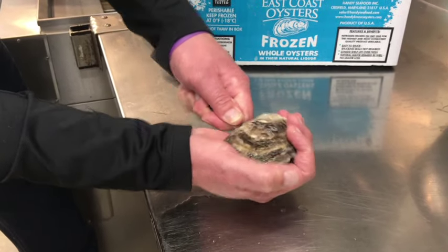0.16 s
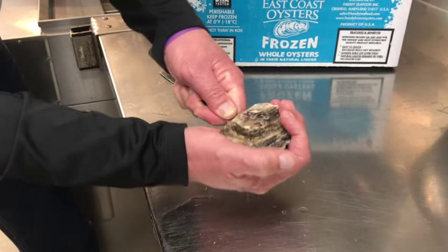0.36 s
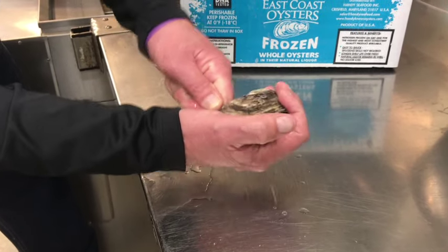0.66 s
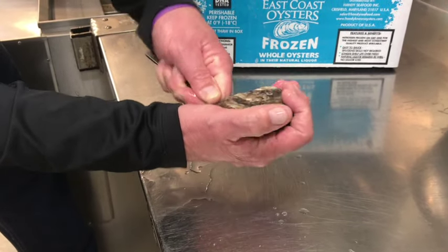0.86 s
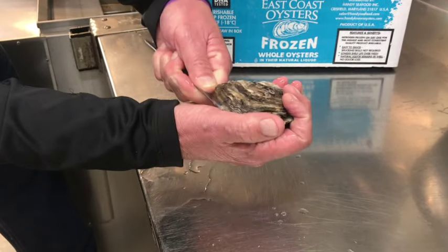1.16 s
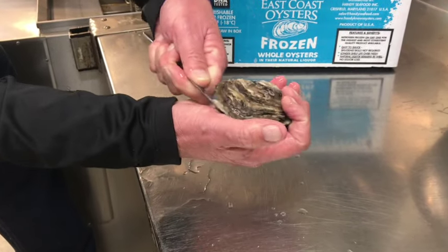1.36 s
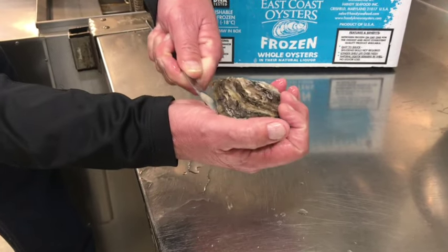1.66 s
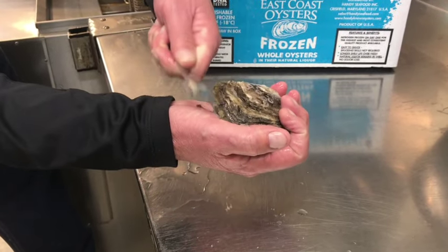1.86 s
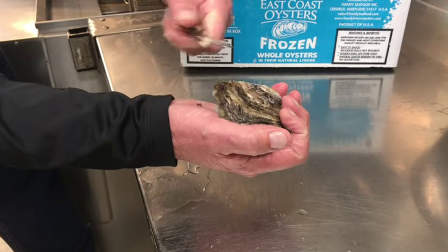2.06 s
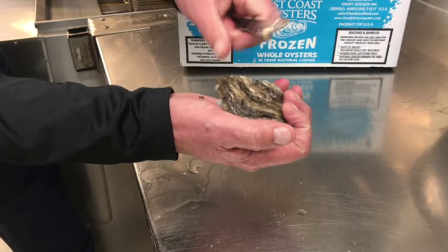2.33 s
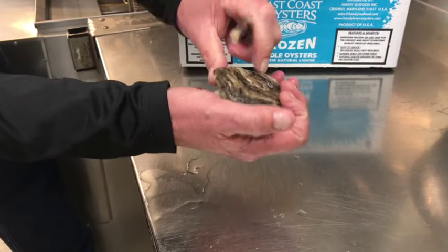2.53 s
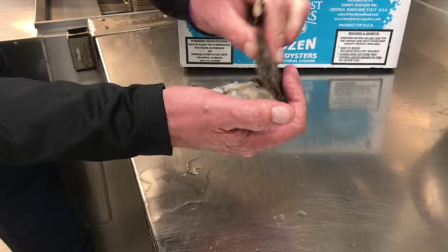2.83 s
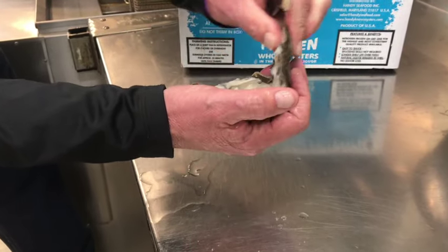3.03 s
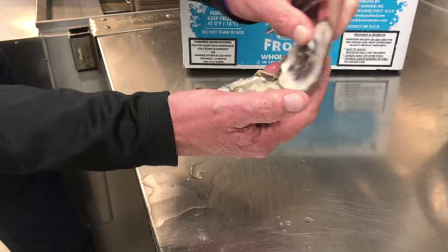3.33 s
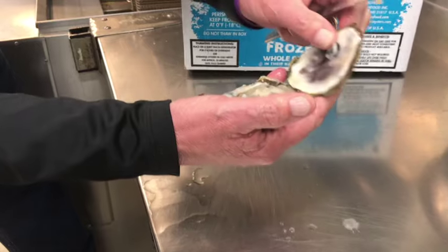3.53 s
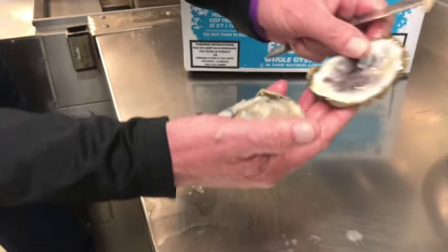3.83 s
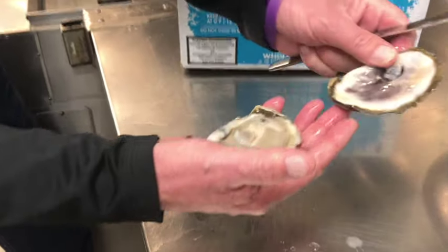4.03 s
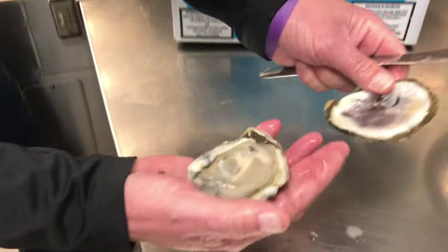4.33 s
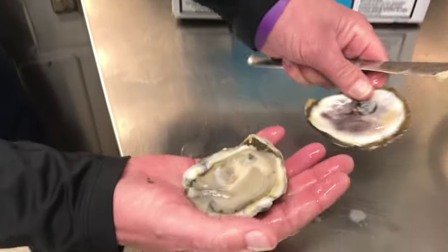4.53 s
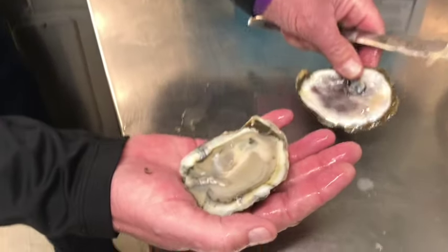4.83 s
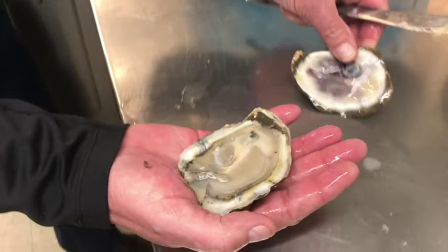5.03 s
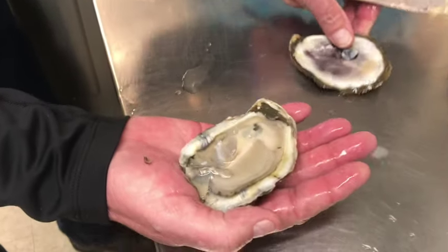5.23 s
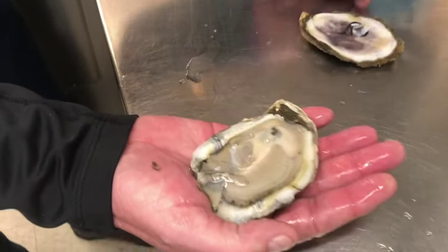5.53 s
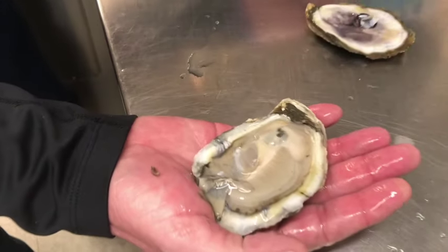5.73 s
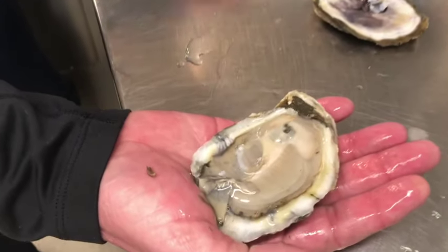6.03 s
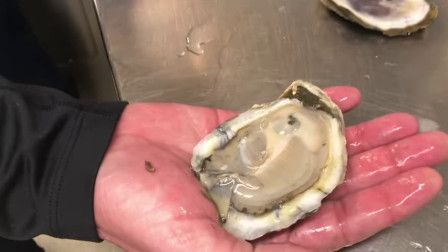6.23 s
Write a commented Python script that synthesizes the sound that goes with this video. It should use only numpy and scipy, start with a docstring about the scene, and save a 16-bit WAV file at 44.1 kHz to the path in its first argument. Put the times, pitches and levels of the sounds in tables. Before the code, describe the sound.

A low fridge drone with a faint wavering fan whine runs throughout, in a small, hard kitchen. Close by, a steel knife twists into an oyster with a few tiny clicks, and at about 0.4 seconds the hinge gives with a sharp hollow knock, the loudest sound. Smaller cracks and gritty scrapes follow, with clear snaps near 1.3 and 1.7 seconds. From 2 to 2.8 seconds the blade grinds along the rim in a quick run of bright, brittle crunches. Then only the hum remains for well over a second. The loose top shell ticks against a steel counter at about 4.7 seconds, touches faintly around 5.1, and lands with a brighter, briefly ringing tap near 5.4. Wet fingers slide over the shell with soft, fine crackles from about 4.9 to 6.2 seconds.

```python
"""Opening an oyster in a kitchen

A steel knife pries open an oyster held in the palm. The hinge gives with a hollow knock, and the rim
crackles and scrapes as swarms of tiny breaks make the shell ring. Wet fingers slide over the shell,
and the top half is set down on a steel counter. A fridge motor and its fan hum in the small, hard room."""
import sys
import numpy as np
from scipy import signal
from scipy.fft import rfft, irfft
from scipy.io import wavfile
from scipy.ndimage import uniform_filter1d

SR = 44100
rng = np.random.default_rng(int(sys.argv[2]) if len(sys.argv) > 2 else 0)


def store_wav(level_fs):
    """Save 16-bit WAV to argv[1]."""
    pcm = np.round(np.clip(np.atleast_2d(level_fs), -1, 1) * 32767)
    wavfile.write(sys.argv[1], SR, pcm.T.astype(np.int16))


N = 281358
TIME = np.arange(N) / SR
SHORT_TIME = np.arange(2 ** 14) / SR  # time axis of one short sound
SHORT_HZ = np.arange(2 ** 13 + 1) * SR / 2 ** 14  # its frequency axis
LEAD_S = .13  # each short sound peaks this long after its start

# The pitches at which the closed oyster rings with the blade in it: pitch_hz, width_hz, level_db
OYSTER_RINGS = [(2290, 74, -9.5), (2900, 360, 0), (3860, 290, -1), (4500, 400, 0.5), (5400, 297, -1),
                (5930, 290, 5.5), (6880, 250, 1.5), (8650, 440, 0), (9290, 350, -1), (10390, 255, -10),
                (12200, 700, -26.5), (14400, 1200, -7.5)]


def undb(db):
    """Turn decibels into a gain."""
    return 10 ** (np.asarray(db) / 20)


def level(sound, db):
    """Give a short sound as much energy as a steady one that lasts 0.05 s at this level."""
    return sound * undb(db) * np.sqrt(.05 * SR / np.sum(sound ** 2))


def add(track, peak_s, sound):
    """Mix in a short sound so that it peaks at peak_s."""
    start = int((peak_s - LEAD_S) * SR)
    lo, hi = max(start, 0), min(start + len(sound), N)
    track[lo:hi] += sound[lo - start:hi - start]


def drift(turns_per_s):
    """A smooth random wander, mostly between -1 and 1."""
    size = int(SR / turns_per_s)
    steps = np.repeat(rng.standard_normal(N // size + 1), size)
    return 1.232 * uniform_filter1d(steps, size)[:N]


def resonance(hz, width_hz):
    """A filter that rings at one pitch; the narrower it is, the longer it rings."""
    loss = 1j * SHORT_HZ * width_hz
    return loss / (hz ** 2 - SHORT_HZ ** 2 + loss)


def ring(force, response, tilt_db=0):
    """The sound of a pushed object; tilt_db per octave brightens or dulls it above 2000 Hz."""
    octaves = np.log2(np.maximum(SHORT_HZ, 2000) / 2000)
    return irfft(rfft(force) * response * undb(tilt_db * octaves))


def shell_response(rings, snap_db, low_hz, grip_shift):
    """A shell's rings, shifted at random by the grip, plus a dry snap. So small a thing gives no bass."""
    shift, weight = rng.standard_normal((2, len(rings)))
    ringing = sum((-1) ** k * undb(db + 1.5 * weight[k]) * resonance(hz * (1 + grip_shift * shift[k]), w)
                  for k, (hz, w, db) in enumerate(rings))
    bass_cut = resonance(low_hz, low_hz) * 1j * SHORT_HZ / low_hz
    return bass_cut * (ringing + undb(snap_db) * resonance(2400, 10000))


def grains(swell_s, fade_s, per_s, spread_db):
    """A swelling and fading swarm of tiny slips and breaks of very unequal size."""
    t = SHORT_TIME - LEAD_S
    envelope = np.exp(np.where(t < 0, t / swell_s, -t / fade_s))
    happens = rng.random(len(t)) < per_s / SR
    size = undb(spread_db * np.minimum(rng.exponential(size=len(t)), 4))
    return envelope * happens * size * rng.choice([-1, 1], len(t))


def crackle(swell_s, fade_s, per_s, spread_db, sharpness=7, count=14):
    """Slips at many small spots, each ticking at a pitch of its own."""
    pitches = np.geomspace(1500, 15000, count) * np.exp(0.054 * rng.standard_normal(count))
    spots = [ring(grains(swell_s, fade_s, per_s, spread_db), resonance(hz, hz / sharpness))
             for hz in pitches]
    return sum(spot * np.sqrt(hz) / np.linalg.norm(spot) for spot, hz in zip(spots, pitches))


def sine(hz, db):
    """A pure tone of steady pitch."""
    return np.sqrt(2) * undb(db) * np.sin(2 * np.pi * hz * TIME)


def wavering_tone(hz, db, waver_hz):
    """A tone that wanders in pitch and strength."""
    phase = 2 * np.pi * np.cumsum(hz + waver_hz * drift(14)) / SR
    return np.sqrt(2) * undb(db + 0.86 * drift(6.8)) * np.sin(phase)


def fridge_motor(motor_hz=58.66, mains_hz=60):
    """The motor drones and lags behind the mains power, so their overtones slowly pulse together."""
    # How loud the drone is over time: time_s, level_db
    drone_levels = [(0.15, -36), (2.57, -37), (3.55, -39), (5.22, -36), (6.2, -36)]
    # Overtones of the motor and the mains: multiple, motor_db, mains_db
    overtones = [(2, -63.5, -52), (4, -63.5, -61)]
    drone = sine(motor_hz, np.interp(TIME, *np.transpose(drone_levels)))
    return drone + sum(sine(k * motor_hz, motor_db) + sine(k * mains_hz, mains_db)
                       for k, motor_db, mains_db in overtones)


def fridge_fan(main_hz=724, throb_hz=1.6):
    """The fan whines with wavering tones over the rush of its air."""
    # The fan's other tones: pitch_hz, level_db, waver_hz
    whines = [(237.5, -57.5, .6), (599, -69.5, .6), (752.3, -68.5, 2), (838, -75, 3), (1057, -69, 1.2),
              (1210, -74, 2.01), (1582, -72.5, 7), (2520, -71.5, 7.03), (2955, -74.5, 8.07),
              (3946, -81.5, 12)]
    # The rushing air, from bass to treble: pitch_hz, level_db (in each 1 Hz band)
    air_levels = [(25, -82), (45, -82), (82, -66.5), (97, -76.5), (155, -79), (188, -74.5), (215, -73.5),
                  (260, -71.5), (350, -79.5), (480, -90), (900, -89), (2000, -99), (4000, -105),
                  (8000, -109), (15500, -113)]
    main_db = -65 + 3 * np.clip((TIME - 2.58) / .2, 0, 1)  # steps up once
    throb = 1 - undb(-10.5) * np.cos(2 * np.pi * throb_hz * TIME)  # from a weaker tone close by
    whine = throb * wavering_tone(main_hz, main_db, waver_hz=1)
    whine += sum(wavering_tone(*row) for row in whines)
    air_hz, air_db = np.transpose(air_levels)
    bins_hz = np.maximum(np.arange(N // 2 + 1) * SR / N, 1)
    colour = undb(np.interp(np.log(bins_hz), np.log(air_hz), air_db)) * np.sqrt(SR / 2)
    air = irfft(rfft(rng.standard_normal(N)) * colour, N)
    return whine + air * undb(0.45 * drift(5.8))


def hollow_knock(hz, db, fade_s, lag_s=0.00221):
    """The gap between the two shells, cupped in the hand, booms briefly just after a break."""
    jolt = np.zeros(len(SHORT_TIME))
    jolt[int((LEAD_S + lag_s) * SR)] = 1
    boom = ring(jolt, resonance(hz, 215) * resonance(hz, 470) ** 2)
    crumbs = grains(0.0022, 1.2 * fade_s, per_s=6000, spread_db=2.4)
    grit = ring(crumbs, resonance(1.05 * hz, 700) * resonance(hz, 1300) ** 2)
    handle_and_palm = resonance(810, 214) * resonance(1276, 700)
    handle_and_palm += 0.29 * resonance(750, 692) * resonance(660, 900)
    thud = ring(jolt, handle_and_palm)
    return level(level(boom, 0) + level(grit, -13) + level(thud, -25), db)


def crunch(force, shell, db, flake_hz, flake_db):
    """Breaks ring the whole oyster, and the flake under the blade adds a pitch of its own."""
    # a smaller flake rings higher and weaker, and makes the whole crunch brighter
    octaves = np.log2(flake_hz / 7000)
    whole = ring(force, shell, tilt_db=4.5 * octaves)
    flake = ring(force, resonance(flake_hz, 800) * resonance(flake_hz, flake_hz / 2))
    return level(level(whole, 0) + level(flake, flake_db - 5.5 * octaves), db)


def knife_cracks():
    """The knife twists and the brittle shell cracks, each time with a knock and a crunch."""
    # Sudden breaks: peak_s, swell_s, fade_s, hollow_db, crunch_db, flake_hz
    cracks = [(.098, 0.00054, 0.0048, -54, -57.5, 2750), (.186, .0004, 0.0034, -51, -55.5, 4540),
              (.293, 0.0031, .006, -46.5, -50.5, 6400), (.4226, 0.0014, 0.0023, -18.5, -40.5, 7600),
              (.607, .001, .002, -42, -49.5, 4740), (.748, .0015, 0.0024, -57, -50.5, 3570),
              (.845, 0.0019, 0.0035, -38.5, -47, 4330), (.862, .001, .002, -48, -42, 7600),
              (1.17, 0.0043, 0.0049, -58.5, -52.5, 4000), (1.322, 0.0012, 0.0037, -37, -36, 4520),
              (1.686, 0.00072, 0.0024, -31.5, -26.5, 6400), (1.959, 0.0013, 0.012, -43.5, -43.5, 4000),
              (2.117, 0.00043, 0.0029, -66, -52.5, 4900), (2.191, 0.0017, .0036, -44, -38.5, 6600),
              (2.305, 0.0018, 0.0025, -48, -33, 3540), (2.452, .0004, .0035, -49, -48, 2400),
              (2.550, 0.0028, 0.002, -55, -35.5, 5460), (2.613, .0012, 0.0035, -54, -38.5, 4070),
              (2.75, 0.0015, 0.0053, -38, -46, 3550)]
    # The gap's note sinks as the blade wedges in, jumps as the hinge gives and rises as the top
    # shell lifts: time_s, pitch_hz
    gap_pitches = [(.1, 1650), (.29, 1370), (.42, 1746), (.85, 1720), (2, 1780), (2.35, 2260), (2.75, 1920)]
    out = np.zeros(N)
    for peak_s, swell_s, fade_s, hollow_db, crunch_db, flake_hz in cracks:
        fracture = grains(swell_s, fade_s, per_s=8000, spread_db=3.1)
        crumbs = crackle(2 * swell_s, 3 * fade_s, per_s=900, spread_db=2.92)
        force = level(fracture, 0) + level(crumbs, -8)
        shell = shell_response(OYSTER_RINGS, snap_db=-7.5, low_hz=1717, grip_shift=.012)
        gap_hz = np.interp(peak_s, *np.transpose(gap_pitches))
        knock = hollow_knock(gap_hz, hollow_db, fade_s)
        add(out, peak_s, knock + crunch(force, shell, crunch_db, flake_hz, flake_db=-6.5))
    return out


def knife_scrapes():
    """The blade grinds along the rim, ringing the shell and the gap inside."""
    # Strokes along the rim: peak_s, length_s, hollow_db, crunch_db, flake_hz
    scrapes = [(0.414, .014, -62, -47.5, 8500), (.715, 0.1, -52, -49.5, 4300),
               (1.133, 0.034, -54.5, -57.5, 4000), (1.316, 0.013, -55, -53.5, 3740),
               (1.954, .014, -51, -50, 4700), (2.201, 0.027, -42, -34.5, 5950),
               (2.303, 0.01, -72, -38, 5100), (2.534, 0.055, -49, -44.5, 6060),
               (2.622, 0.01, -59, -37, 3670), (2.692, 0.076, -48.5, -46, 3900),
               (2.732, 0.032, -41, -42.5, 6050)]
    out = np.zeros(N)
    for peak_s, length_s, hollow_db, crunch_db, flake_hz in scrapes:
        force = crackle(.56 * length_s, .44 * length_s, per_s=300, spread_db=3.9, count=22)
        shell = shell_response(OYSTER_RINGS, snap_db=-2.5, low_hz=1390, grip_shift=0.092)
        gap = ring(force, resonance(2020, 680) * resonance(1720, 1600))
        add(out, peak_s, level(gap, hollow_db) + crunch(force, shell, crunch_db, flake_hz, flake_db=-11))
    return out


def finger_rubs():
    """Wet fingers slip over the shell with a fine crackle and muffle most of its ringing."""
    # Finger slides: peak_s, length_s, level_db, tilt_db (per octave)
    rubs = [(4.136, .022, -65, -1), (4.93, 0.022, -51, -2.5), (5.192, 0.034, -50, 4),
            (5.698, 0.032, -51, -.7), (5.969, .05, -47, -2), (6.167, 0.018, -63.5, -4)]
    held_shell = undb(1) * resonance(5660, 450) + resonance(2700, 9300)
    held_shell += undb(-25.5) * resonance(14300, 2000)
    out = np.zeros(N)
    for peak_s, length_s, db, tilt_db in rubs:
        force = crackle(.57 * length_s, .43 * length_s, per_s=350, spread_db=3.6, sharpness=26, count=20)
        add(out, peak_s, level(ring(force, held_shell, tilt_db), db))
    return out


def shell_taps():
    """The loose top shell ticks against the steel counter and rings."""
    # Touches on the counter: peak_s, fade_s, level_db, tilt_db (per octave)
    taps = [(4.685, 0.0015, -41, -1.5), (5.047, .007, -58, -4), (5.111, 0.0019, -54.5, -1.5),
            (5.447, 0.005, -38, 1), (5.634, .006, -56, -0.5)]
    # The pitches at which the top shell rings: pitch_hz, width_hz, level_db
    top_rings = [(2340, 98, -2.5), (2802, 83, 3.5), (3675, 72, 1), (5900, 100, 9), (5970, 810, 2.5),
                 (6500, 100, 9), (7400, 200, -8), (8250, 110, 5), (8670, 220, -5), (10280, 97, 4.5),
                 (12000, 140, -18), (13100, 250, -11), (13200, 160, -15), (14600, 330, -11)]
    low_ring = undb(-7) * resonance(980, 400)
    out = np.zeros(N)
    for peak_s, fade_s, db, tilt_db in taps:
        shell = shell_response(top_rings, snap_db=-11, low_hz=2200, grip_shift=0.012)
        force = grains(0.00053, fade_s, per_s=9000, spread_db=3.7)
        add(out, peak_s, level(ring(force, shell + low_ring, tilt_db), db))
    return out


def kitchen(sound, tail_db=-6, scatter_db=-6, scatter_s=0.017):
    """The room adds echoes, scatter from nearby steel and a short tail that loses its treble first."""
    # Echoes from counter, box and wall: delay_s, gain
    echoes = [(.0047, 0.28), (.0094, 0.29), (0.015, 0.13), (.0205, .12), (.043, 0.12)]
    # How long the room takes to fade by 60 dB: pitch_hz, fade_s
    room_fades = [(1000, 0.37), (2000, 0.33), (4000, 0.34), (8000, 0.25), (14000, 0.2)]
    response = np.zeros(len(SHORT_TIME))
    response[0] = 1  # the direct sound
    for delay_s, gain in echoes:
        response[int(delay_s * SR)] += gain
    tail_noise, scatter_noise = rng.standard_normal((2, len(SHORT_TIME)))
    build_up = 1 - np.exp(-(SHORT_TIME / 0.0071) ** 2)
    band_hz, fades_s = np.transpose(room_fades)
    bands = [irfft(rfft(tail_noise) * np.interp(SHORT_HZ, band_hz, share))
             for share in np.eye(len(band_hz))]
    tail = build_up * sum(band * undb(-60 * SHORT_TIME / fade_s) for band, fade_s in zip(bands, fades_s))
    scatter = build_up * scatter_noise * np.exp(-SHORT_TIME / scatter_s)
    response += undb(tail_db) * tail / np.linalg.norm(tail)
    response += undb(scatter_db) * scatter / np.linalg.norm(scatter)
    return signal.fftconvolve(sound, response / np.linalg.norm(response))[:N]


def scene():
    """Knife, fingers and shells in the room, over the fridge, in one channel."""
    oyster = knife_cracks() + knife_scrapes() + finger_rubs() + shell_taps()
    return (kitchen(oyster) + fridge_motor() + fridge_fan())[None]


def record(dry):
    """A nearby phone cuts the treble above 15800 Hz."""
    return signal.sosfilt(signal.ellip(10, .2, 80, 15800, fs=SR, output="sos"), dry)


dry = scene()
out = record(dry)
store_wav(out)
```